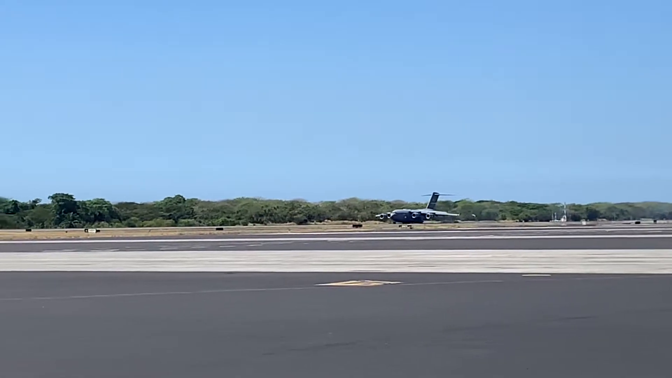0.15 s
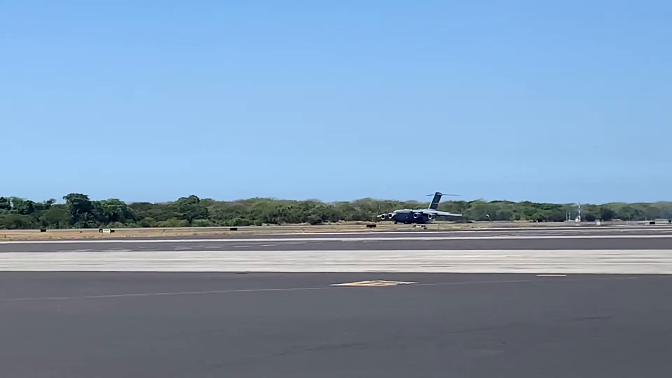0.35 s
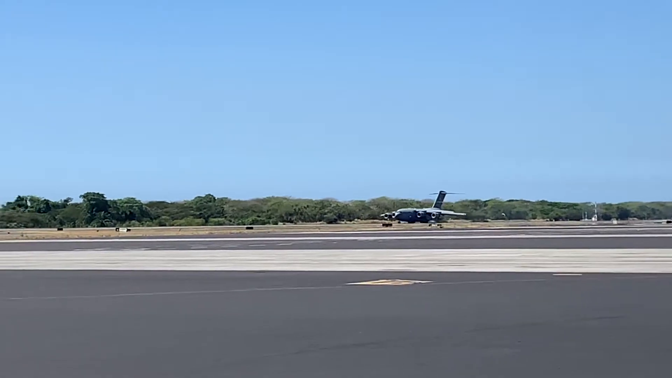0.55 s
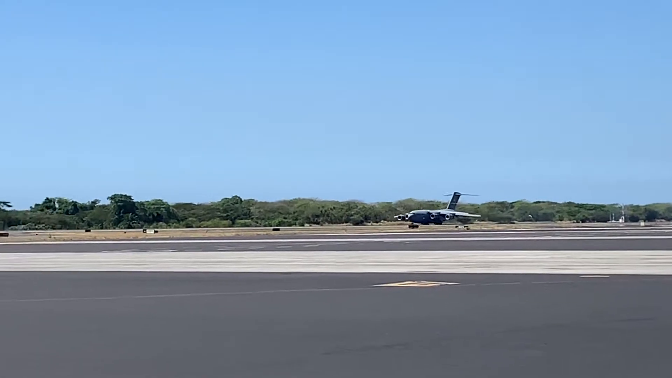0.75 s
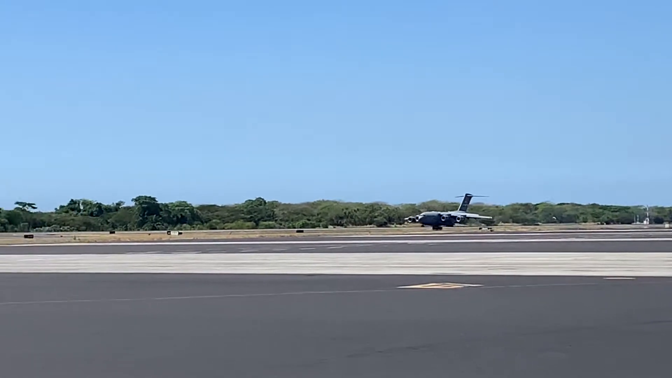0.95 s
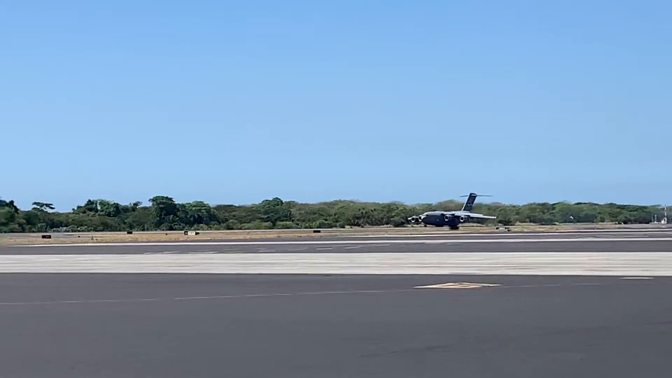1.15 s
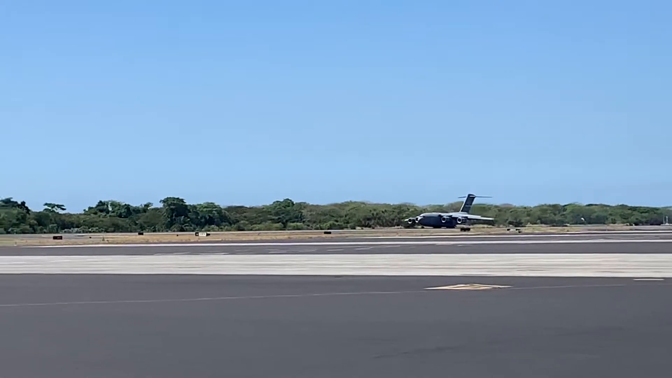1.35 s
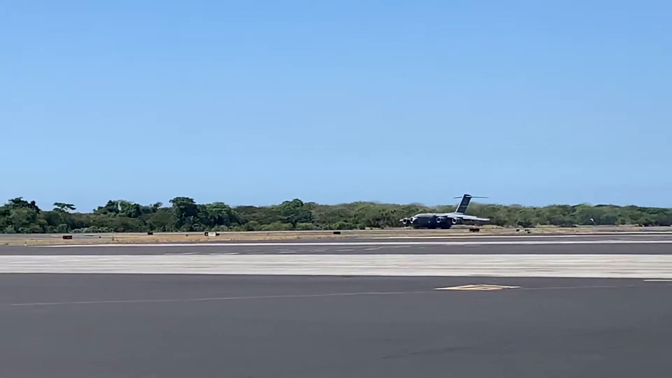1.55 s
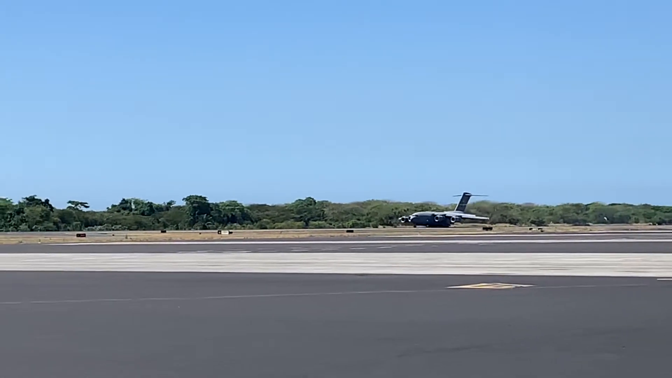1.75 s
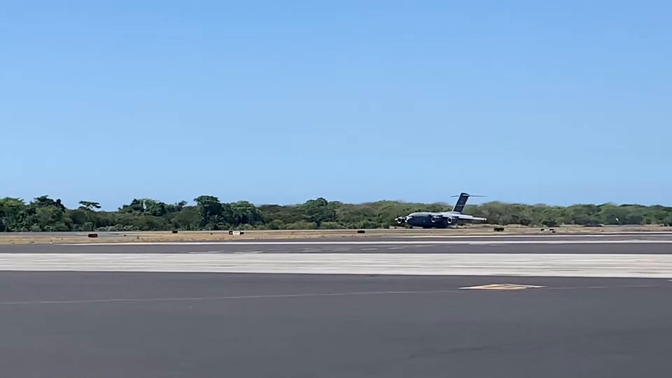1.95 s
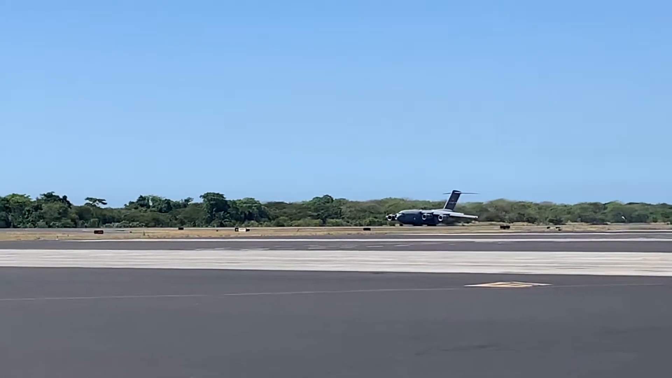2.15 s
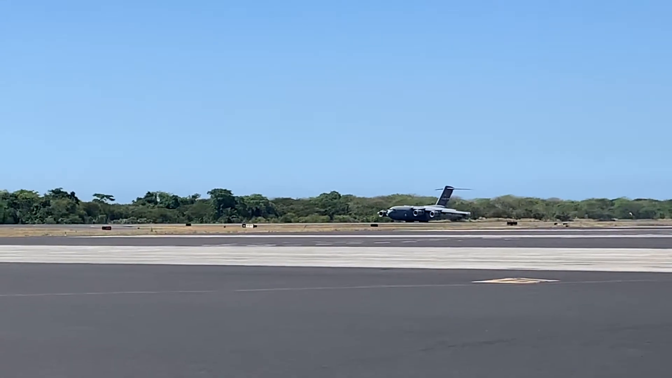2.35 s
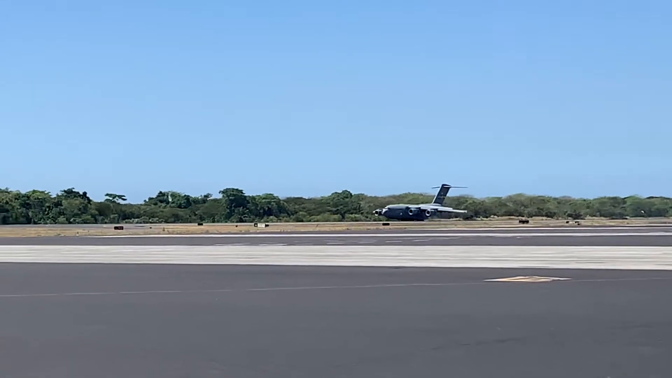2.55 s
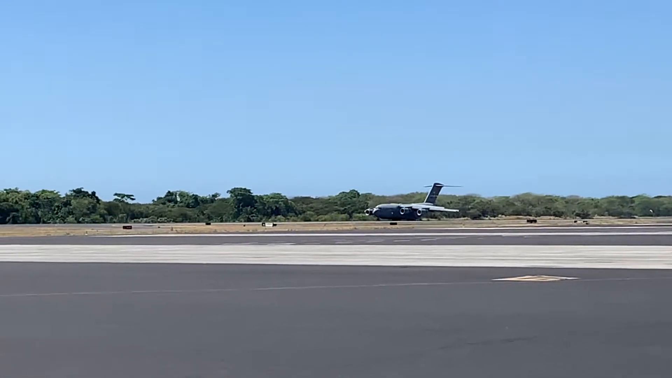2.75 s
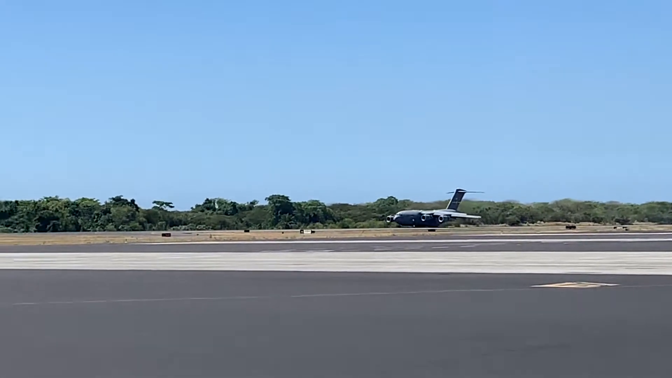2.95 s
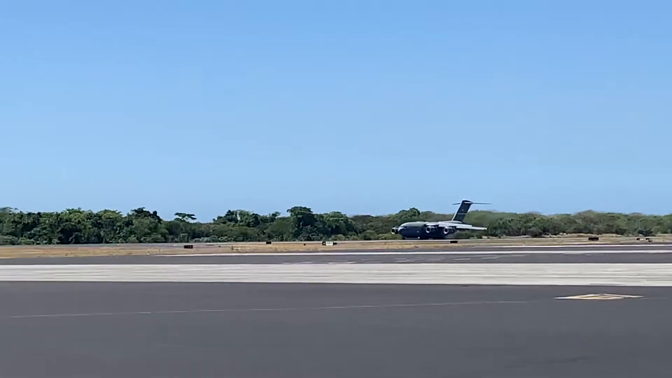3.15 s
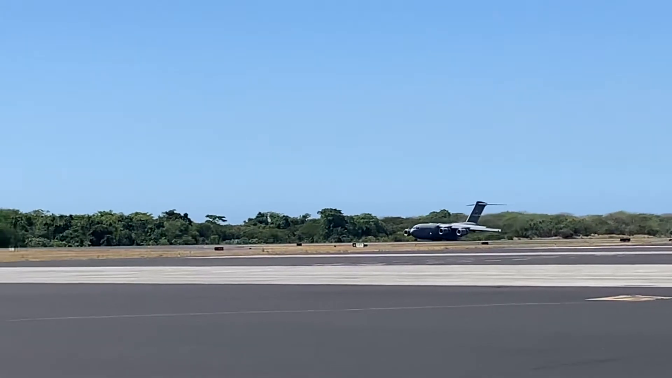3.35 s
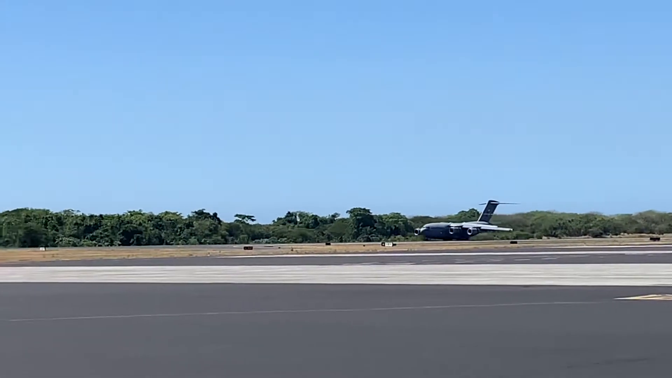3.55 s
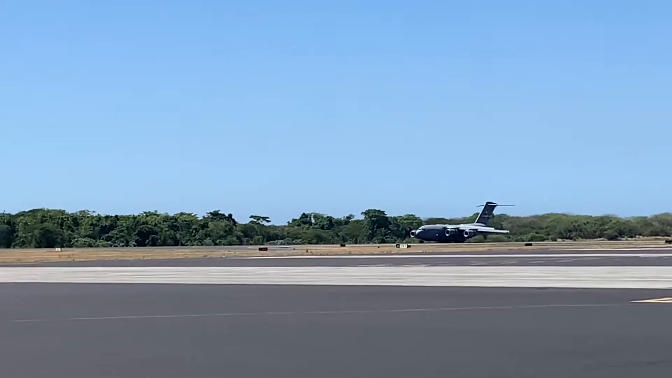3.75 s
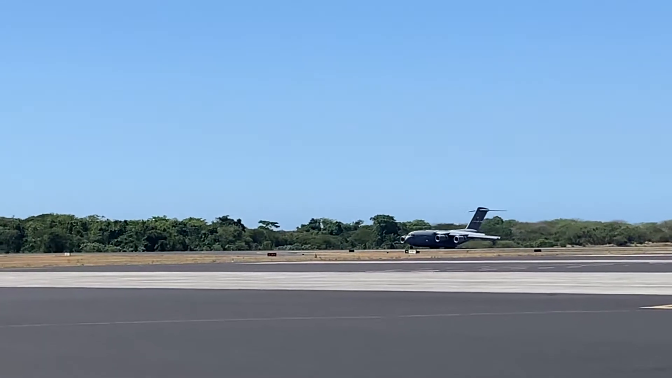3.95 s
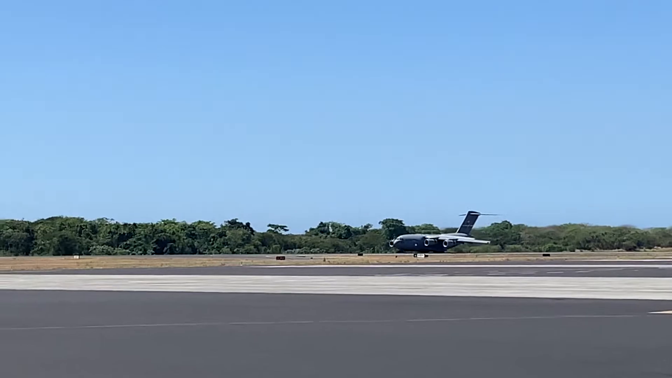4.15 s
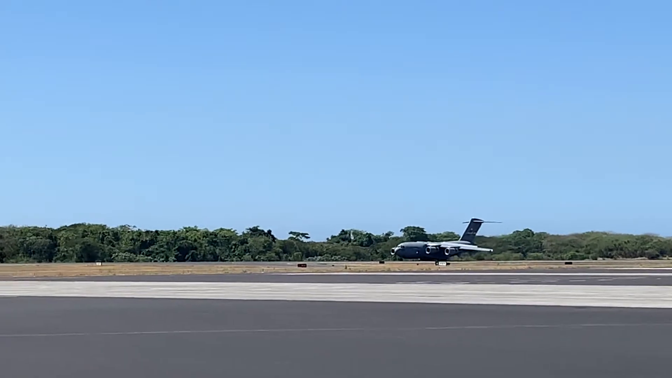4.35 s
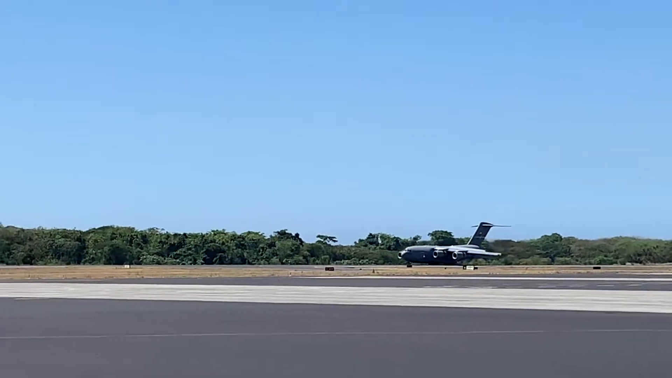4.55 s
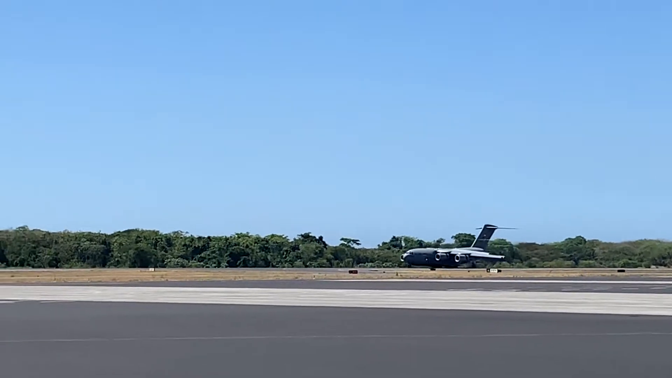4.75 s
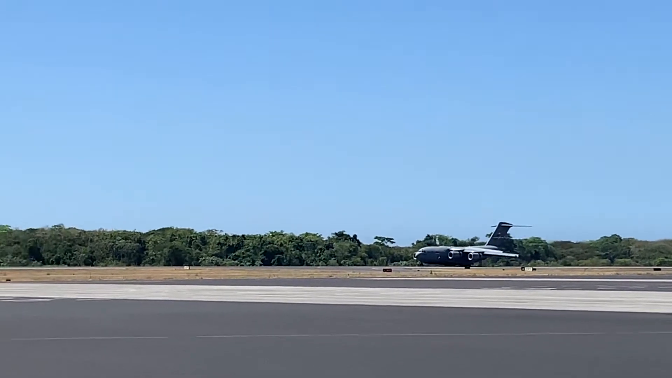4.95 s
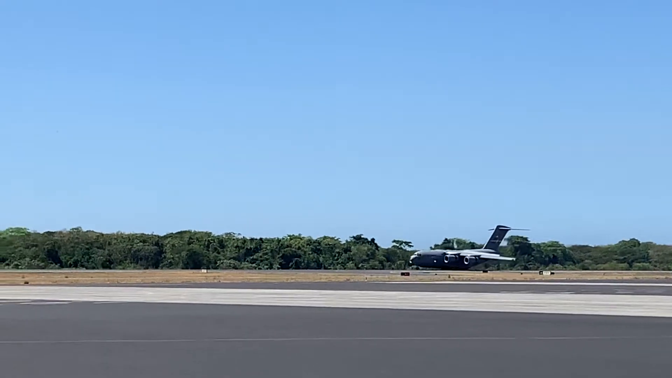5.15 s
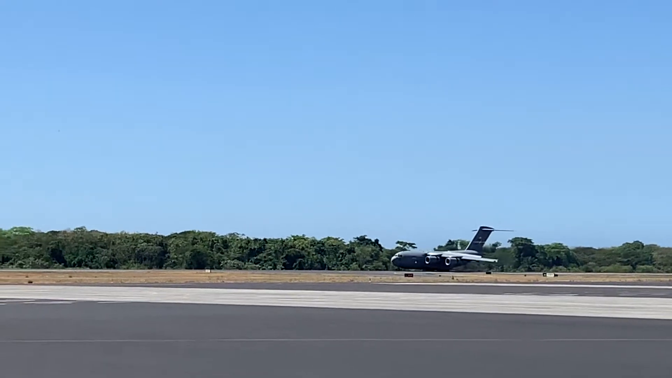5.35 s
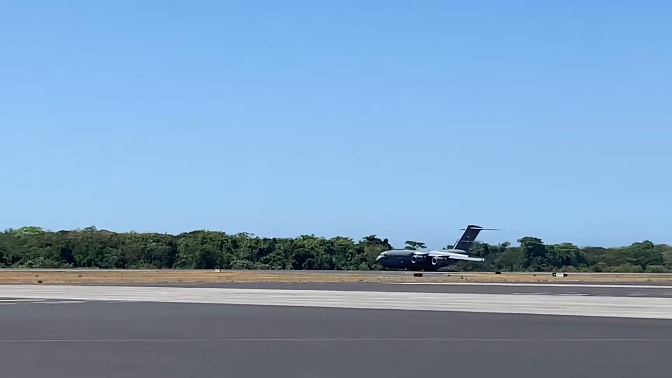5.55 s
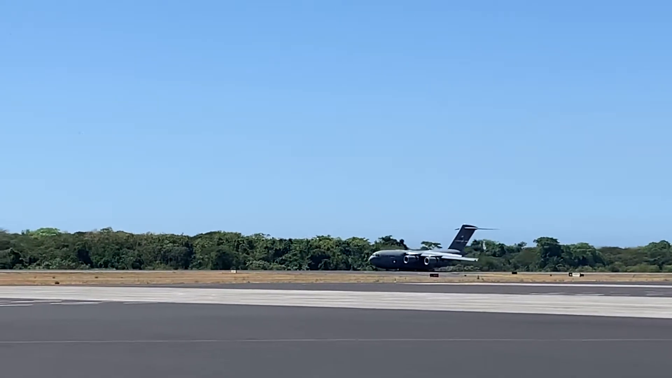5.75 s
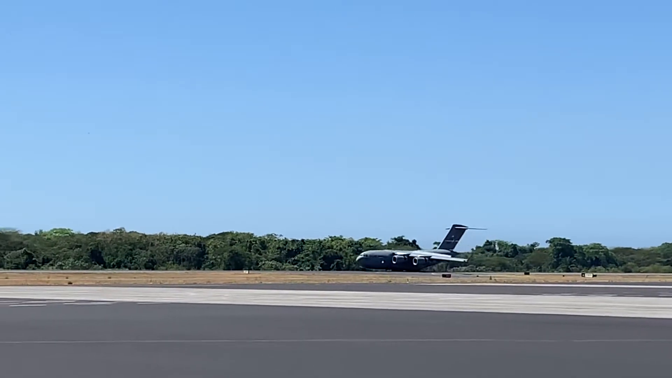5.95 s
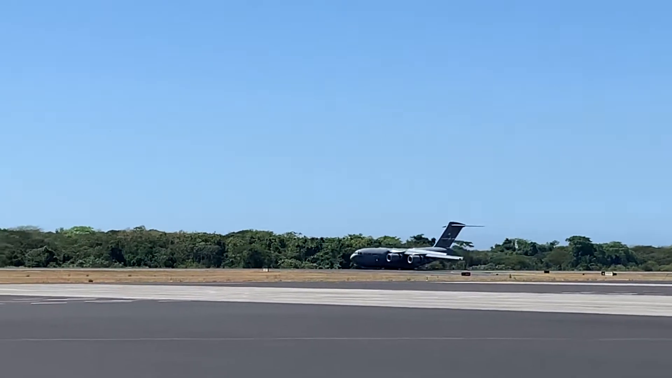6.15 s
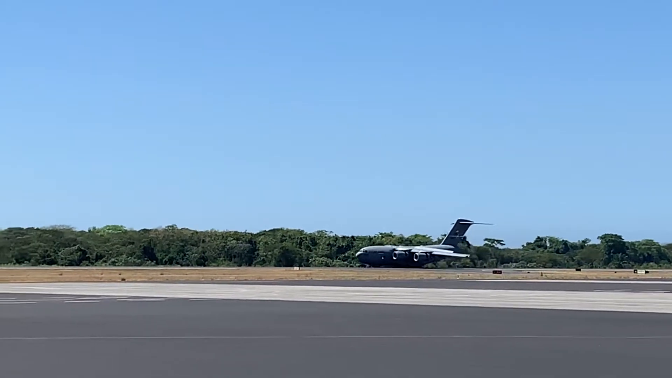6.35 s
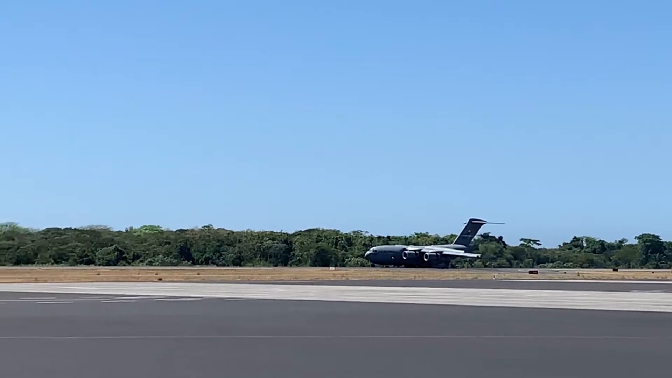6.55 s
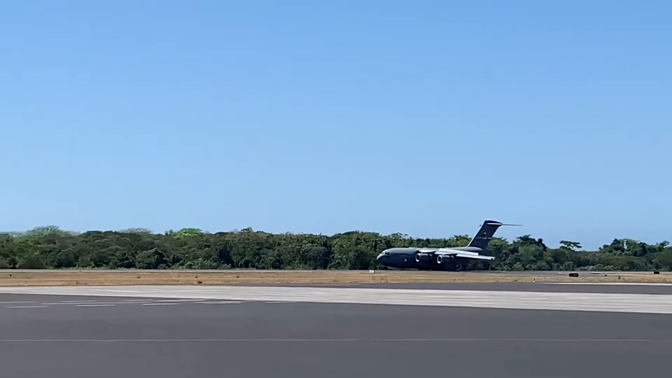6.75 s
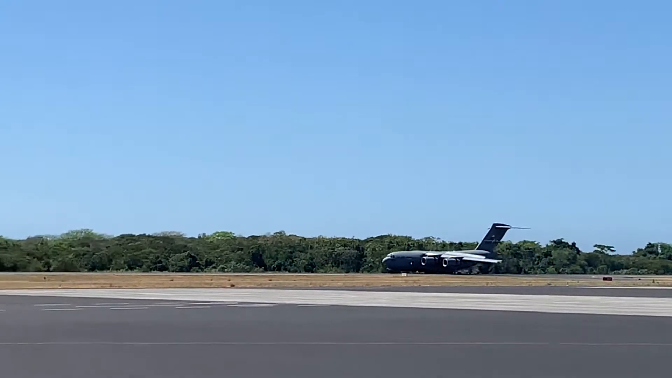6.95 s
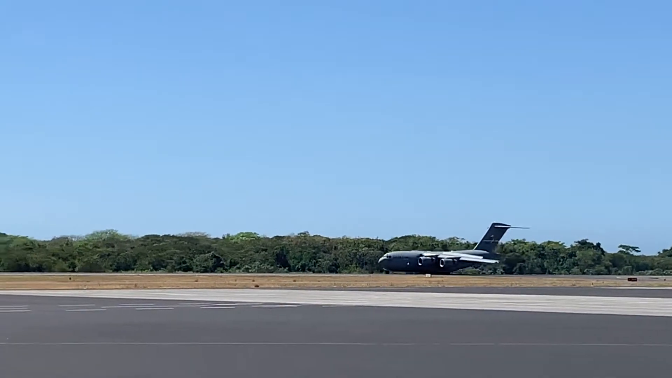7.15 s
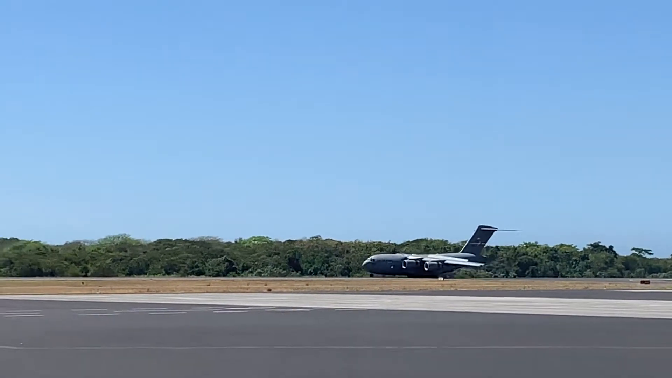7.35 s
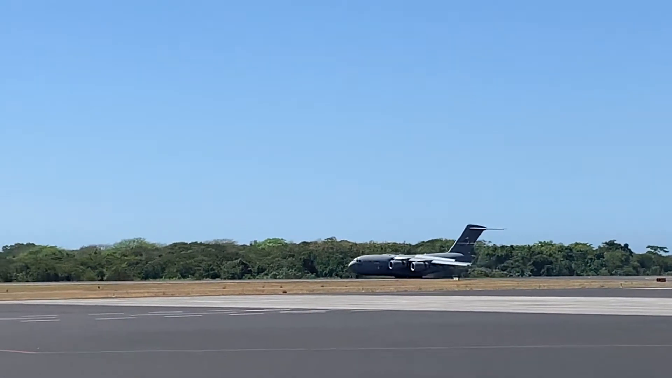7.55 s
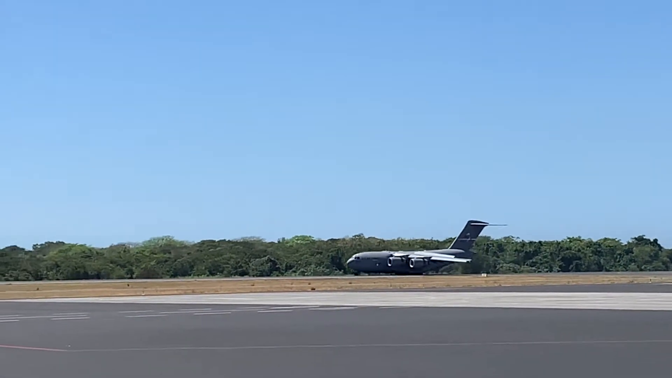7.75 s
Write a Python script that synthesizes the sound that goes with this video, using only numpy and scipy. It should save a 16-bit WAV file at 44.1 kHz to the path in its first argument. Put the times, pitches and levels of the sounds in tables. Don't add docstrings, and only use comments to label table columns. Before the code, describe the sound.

Outdoors on an open airfield, a large four-engine cargo jet rolls along a runway a few hundred metres away. At first its engines spool down, a low rumble with soft hiss and thin gliding whines. Midway the thrust reversers open and the exhaust swells to a heavy, wavering roar. A tiny tick touches the hand-held phone just before the loudest stretch.

```python
import sys
import numpy as np
from scipy import signal
from scipy.fft import rfft, irfft, next_fast_len
from scipy.io import wavfile
from scipy.ndimage import uniform_filter1d, minimum_filter1d, map_coordinates

SR = 44100
rng = np.random.default_rng(int(sys.argv[2]) if len(sys.argv) > 2 else 0)


def voltage_ratio(level):
    return 10 ** (np.asarray(level, float) / 20)


def pcm_store(signal):
    levels = np.round(np.clip(np.atleast_2d(signal), -1, 1) * 32767)
    wavfile.write(sys.argv[1], SR, levels.astype(np.int16).T)


N = 344421
TIME, HZ = np.arange(N) / SR, np.fft.rfftfreq(N, 1 / SR)


def along(table, hz, axis=1):
    rows = np.array(table, float)
    return np.interp(np.log(hz + 1), np.log(rows[:, 0] + 1), rows[:, axis])


def band_db(spectrum, lo, hi):
    inside = (HZ > lo) & (HZ < hi)
    return 10 * np.log10(2 * np.sum(np.abs(spectrum[inside]) ** 2) / N ** 2)


def chance(shape, count):
    cells = rng.standard_normal(np.array(count) + 2)
    axes = map(np.linspace, [0] * len(shape), count, shape)
    return map_coordinates(cells, np.meshgrid(*axes, indexing="ij"), order=3)


# [t/s, level/dB]
THRUST = [(0.0, -35), (0.15, -34), (1.17, -39), (1.43, -38), (1.89, -42), (2.81, -44), (4.52, -37),
          (5.55, -30), (5.79, -27), (6.2, -28), (6.57, -23.5), (6.61, -24.5), (7.18, -24.5), (7.55, -22),
          (7.57, -26), (7.81, -27.5)]
# [level at idle/dB, slope/(dB per dB of power), gain with reversers open/dB]
LAYERS = [
    (-29.5, 0.38, 8),
    (-37, 0.67, 7.5),
    (-38, 1.1259, -5),
    (-44.5, 1.0, 1),
]
# [t/s, duration/s, rumble/dB, roar/dB, core/dB]
GUSTS = [
    (.1, .4, 0.5, -0.5, 3),
    (.8, .15, -5.5, 1.5, -0.5),
    (1.2, .25, 0.5, 4.5, 0),
    (3.5, 0.33, 2, -1, 6.5),
    (4.1, 0.46, 1.5, -0.5, -3),
    (4.9, .25, 1.5, 1.5, 3),
    (6.65, 0.27, 2, -0.5, 1),
    (7.75, .35, -4, -1, -1.5),
]


def layer_levels(s):
    power_db = np.interp(s, *np.transpose(THRUST)) + 44
    reverse_s, spread_s = 4.53, 0.5
    doors = (1 + np.tanh((s - reverse_s) / spread_s)) / 2
    levels = np.array([db + slope * power_db + doors_db * doors for db, slope, doors_db in LAYERS])
    for at, lasting, *db in GUSTS:
        levels += np.outer([*db, 0], np.exp(-((s - at) / lasting) ** 2))
    return levels


JOIN_HZ = 450
# [f/Hz, density/dB]
RUMBLE = [(20, -27.5), (33, -13.5), (44, -12.5), (55, 1.5), (65, 1.5), (82, -1.5), (97, 0.5), (120, -5.5),
          (150, -8.5), (220, -11), (290, -10), (370, -15.5), (450, -20), (600, -20)]
# [f/Hz, density/dB]
FULL = [(180, -30), (300, 10), (480, -9), (868, -7.5), (1040, -15), (1370, -11.5), (1590, -14.5),
        (1990, -15.5), (2690, -16.5), (2960, -21), (3260, -16.5), (4070, -17.5), (5290, -34), (6500, -37.5),
        (8110, -56), (10500, -86.5), (17800, -120)]


def thrust_colour(hz):
    low = along(RUMBLE, hz) - along(RUMBLE, JOIN_HZ)
    high = along(FULL, hz) - along(FULL, JOIN_HZ)
    return np.where(hz < JOIN_HZ, low, high)


# [low f/Hz, high f/Hz]
BANDS = [
    (40, 140),
    (140, 450),
    (450, 1700),
    (1700, 5500),
]
# [f/Hz, density/dB]
IDLE = [(180, -33), (300, -3), (369, 5.5), (486, 1), (632, -1.5), (856, -3), (1070, -7.5), (1370, -7),
        (1590, -12), (1880, -10), (2480, -13.5), (3220, -14), (4240, -18), (5360, -39), (8110, -57.5),
        (10500, -86), (17800, -120)]
# [f/Hz, width/Hz, level/dB, t of peak/s, duration/s]
SWELLS = [(1593, 216, 7, 0.3, 0.87), (620, 86, 4, .3, 0.3), (2600, 600, -3.5, 2.86, 0.34),
          (800, 84, 4.5, 3.4, 1), (4000, 710, -3, 2.7, 0.85), (6200, 1100, 7.5, 4, 0.94),
          (237, 43, 4, 4.9, 1), (420, 130, 5.5, 6.8, 0.39), (2060, 170, 3.5, 6.5, 0.93),
          (193, 54, 6, 6.75, 0.34), (3750, 310, -4, 6.96, 0.74), (75, 18, 1.5, 6.4, 0.15),
          (3650, 500, 3, 7.42, 0.19), (1500, 140, 6, 1.2, 0.27)]
# [start t/s, end t/s, low f/Hz, high f/Hz]
HUSH = (4.9, 6.7, 8700, 10700)


def exhaust(slow_db=0.5, quick_db=0.54, full_db=-30, span_db=8):
    hush_low_hz = HUSH[2]
    spectra = rfft(rng.standard_normal((2, N))) * voltage_ratio(thrust_colour(HZ)) * (HZ < hush_low_hz)
    hz, s, frames = signal.stft(irfft(spectra, N), SR, nperseg=2048)
    levels = layer_levels(s)

    idle = np.clip((full_db - levels[-1]) / span_db, 0, 1)
    shift = (hz > JOIN_HZ) * (along(IDLE, hz) - along(IDLE, JOIN_HZ) - thrust_colour(hz))
    tint_db = np.outer(shift, idle)
    for centre, width, db, peak, lasting in SWELLS:
        tint_db += db * np.exp(-((hz[:, None] - centre) / width) ** 2 - ((s - peak) / lasting) ** 2)

    power = voltage_ratio(2 * (thrust_colour(hz)[:, None] + tint_db)) / len(hz)
    swell = []
    for db, (lo, hi) in zip(levels, BANDS):
        band_power = power[(hz > lo) & (hz < hi)].sum(axis=0)
        swell.append(db - 10 * np.log10(band_power))
    bands = np.arange(len(BANDS))
    centres = np.log(np.prod(BANDS, axis=1)) / 2
    place = np.interp(np.log(hz + 1), centres, bands)
    gain_db = np.maximum(1 - np.abs(place[:, None] - bands), 0) @ swell

    cell = np.round(np.log2(hz / 60 + 1) * 30).astype(int)
    size = (cell[-1] + 1, len(s))
    patches = slow_db * chance(size, count=(24, 10)) + quick_db * chance(size, count=(12, 60))
    patches += 1.5 * chance(size, count=(110, 24))
    return signal.istft(frames * voltage_ratio(gain_db + tint_db + patches[cell]), SR, nperseg=2048)[1][:, :N]


# [t/s, f/Hz, level/dB]
SPOOL = [(0, 4830, -54), (.4, 4550, -53), (.7, 4310, -50), (.93, 4140, -47), (1.15, 3930, -48),
         (1.4, 3720, -46), (1.9, 3310, -50), (2.4, 3030, -48), (2.9, 2905, -48.5), (3.4, 2950, -49),
         (3.9, 3080, -51), (4.5, 3250, -52), (5.2, 3400, -70)]
# [ratio to spool tone, level/dB, t of peak/s, duration/s, ratio drift/(1/s)]
BLADES = [
    (1.0, 0, 2.0, 9.0, 0),
    (.868, -3, 1.8, 2.8, 0),
    (.795, -5, 2.0, 3.4, 0),
    (.835, -7, 1.2, 1.6, .02),
    (.93, -9, .8, 1.4, 0),
    (1.2, -6, 1.1, .7, 0),
    (1.26, -8, 1.0, .6, 0),
    (1.23, -5, 2.75, .45, .25),
    (1.72, -2, 3.0, 1.4, 0),
]


def blades(hump_db=5.5, hump_hz=3250, wide_hz=150):
    s, hz, db = np.transpose(SPOOL)
    spool = uniform_filter1d(np.interp(TIME, s, hz), SR // 3, mode="nearest")

    def path(hz):
        return along(IDLE, hz) + hump_db * np.exp(-((hz - hump_hz) / wide_hz) ** 2)

    out = 0
    for ratio, row_db, peak, lasting, drift in BLADES:
        pitch = (ratio + drift * (TIME - peak)) * spool
        fade_db = row_db - 12 * ((TIME - peak) / lasting) ** 2 + 1.5 * chance((N,), count=(60,))
        smear = chance((N,), count=(800,)) + 1j * chance((N,), count=(800,))
        tone = np.imag(smear * np.exp(2j * np.pi * np.cumsum(pitch) / SR))
        out = out + voltage_ratio(fade_db + path(pitch) - path(spool)) * tone
    return out * voltage_ratio(np.interp(TIME, s, db, right=-150))


# [t/s, lag/ms, strength 0-1]
GROUND = [
    (0, 1.77, 0.36),
    (1.8, 1.83, 0.22),
    (2.7, 1.7, 0.24),
    (4.0, 1.5, 0.06),
    (6.0, 1.515, 0.03),
    (7.81, 1.52, 0.21),
]


def tarmac(x):
    s, ms, strength = np.transpose(GROUND)
    share = np.interp(TIME, s, strength)
    lag_s = np.interp(TIME, s, ms) / 1000
    late = np.array([np.interp(TIME - lag_s, TIME, v) for v in x])
    return (x + share * late) / np.sqrt(1 + share ** 2)


# [f/Hz, coherence 0-1, left minus right/dB]
PORTS = [(60, 0.93, -1.5), (250, 0.96, -1.3), (500, 0.54, -0.5), (1000, 0.57, -1.1), (1700, .55, 0),
         (2600, 0.6, -1.5), (4000, 0.87, -0.8), (5000, 0.5, -2), (6300, .55, -4), (7050, .4, -0.7),
         (8500, 0.5, -5.5)]
# [f/Hz, left lead/rad]
LEAD = [(20, 0), (200, -.15), (520, -.7), (780, -.2), (2150, -1.1), (2500, -.2), (2840, -.6), (3100, -.2),
        (4390, .1), (5170, -2.0), (5860, -.6), (6200, -.4), (7060, -2.6), (7900, -2.7)]


def ports(x):
    edge = 2048
    size = next_fast_len(N + 2 * edge)
    direct, scattered = rfft(np.pad(x, ((0, 0), (edge, size - N - edge)), mode="reflect"))
    hz = np.fft.rfftfreq(size, 1 / SR)
    like = np.clip(along(PORTS, hz), 0, 1)
    lead = along(LEAD, hz)
    half = voltage_ratio(along(PORTS, hz, axis=2) / 2) * np.exp(.5j * lead)
    common = direct * np.sqrt((1 + like) / 2)
    apart = scattered * np.sqrt((1 - like) / 2)
    keep = np.sqrt(2 / (1.065 + like * np.cos(lead)))
    pair = np.array([(common + apart) * half, (common - apart) / half])
    return irfft(keep * pair, size)[:, edge:edge + N]


# [f/Hz, common level/dB, opposite level/dB]
AIR = [(5500, 7, -4), (7000, 0, -4), (8100, -2.5, -5), (9700, -10, -8), (10500, -12, -18.5),
       (11160, -4, -10.5), (11500, -15, -12), (11800, -38.5, -6.5), (12300, -38, -10.5),
       (12800, -9.5, -15.5), (13200, -9.5, -41), (13700, -9.5, -42.5), (14300, -15.5, -13),
       (14800, -40.5, -12.5)]


def air(start_db=10, settle_s=0.064, after_db=6, flutter_db=1.5):
    hush_on_s, hush_off_s, low_hz, high_hz = HUSH
    colour = voltage_ratio([along(AIR, HZ), along(AIR, HZ, axis=2)]) * (HZ > 5500) * (HZ < 15000)
    spectra = rfft(rng.standard_normal((2, N))) * colour
    closed = (TIME > hush_on_s) * (TIME < hush_off_s)
    hushed = irfft(spectra * (HZ > low_hz) * (HZ < high_hz), N) * closed
    level_db = -79.5 - band_db(spectra[0], 7500, 15000)
    mid, side = (irfft(spectra, N) - hushed) * voltage_ratio(level_db)
    flutter = flutter_db * chance((N,), count=(160,))
    after = voltage_ratio((after_db + flutter) * (TIME > hush_off_s))
    return np.array([mid + side, mid - side]) * (after + voltage_ratio(start_db) * np.exp(-TIME / settle_s))


# [t/s, peak level/dB, left minus right/dB]
TICK = [
    (4.8137, -42.5, -16),
]


def tick(hz=8400, ring_s=0.00086, snap_hz=10000, snap_s=.0001, snap_db=2):
    out = 0
    for s, db, pan_db in TICK:
        age = TIME - s - .001
        ring = np.exp(-np.abs(age) / ring_s) * np.sin(2 * np.pi * hz * age)
        snap = voltage_ratio(snap_db) * np.exp(-(age / snap_s) ** 2 / 2) * np.sin(2 * np.pi * snap_hz * age)
        sides = voltage_ratio(db + np.array([[pan_db], [-pan_db]]) / 2)
        out = out + (ring + snap) * sides * np.array([[-1], [1]])
    return out


def scene():
    jet = tarmac(exhaust())
    jet[0] += blades()
    return ports(jet) + air() + tick()


def low_pass(x):
    return signal.sosfilt(signal.butter(12, 14800, fs=SR, output="sos"), x)


def record(dry):
    ceiling, reach = .93, 441
    room = np.minimum(ceiling / (np.abs(dry).max(axis=0) + 1e-9), 1)
    lowest = minimum_filter1d(room, 2 * reach)
    gain = uniform_filter1d(uniform_filter1d(lowest, reach), reach)
    edges = np.minimum((TIME[-1] - TIME) / .006, 1)
    return low_pass(dry * gain * edges)


dry = scene()
out = record(dry)
pcm_store(out)
```